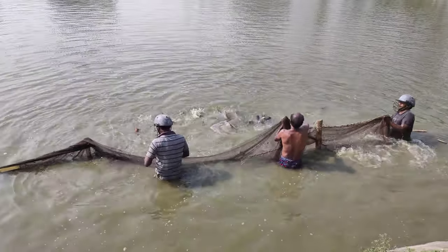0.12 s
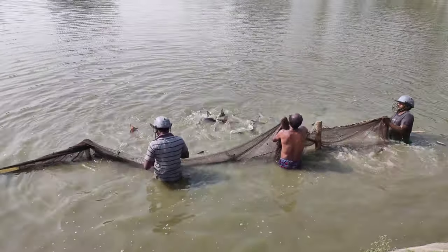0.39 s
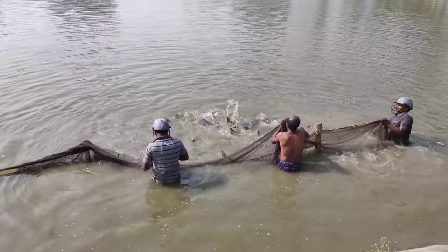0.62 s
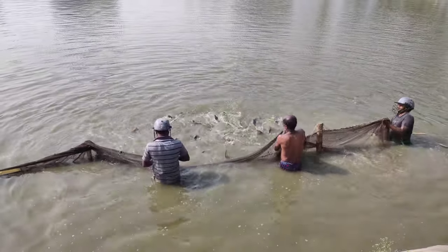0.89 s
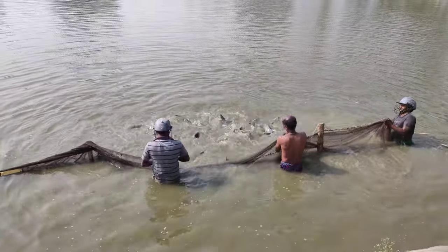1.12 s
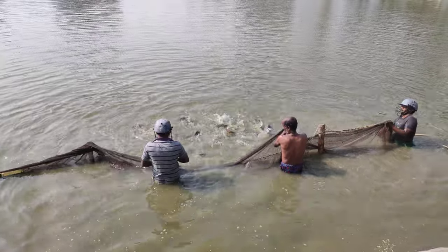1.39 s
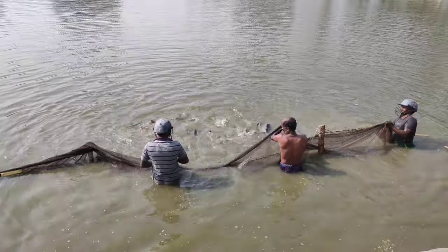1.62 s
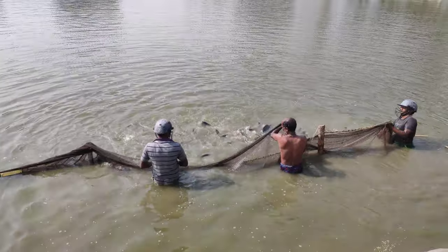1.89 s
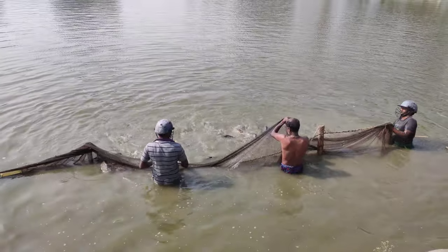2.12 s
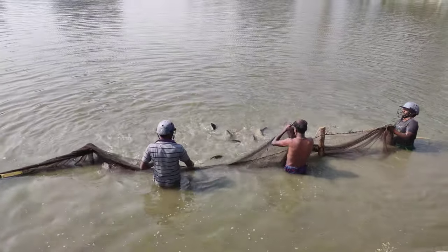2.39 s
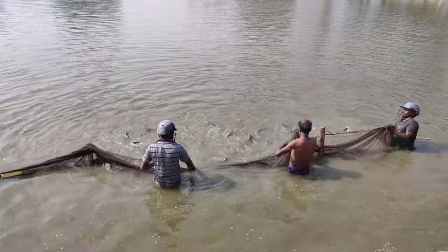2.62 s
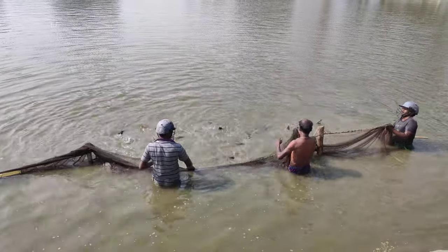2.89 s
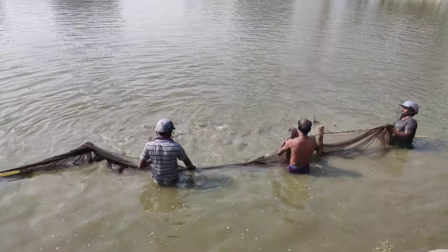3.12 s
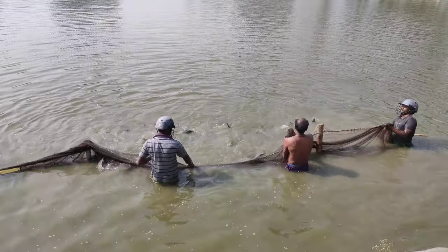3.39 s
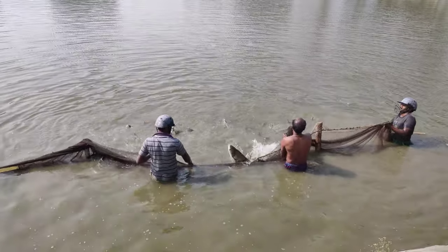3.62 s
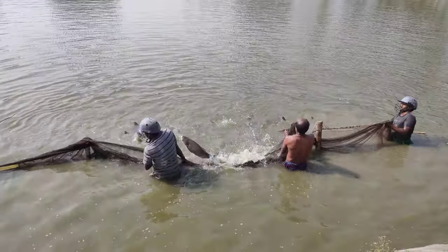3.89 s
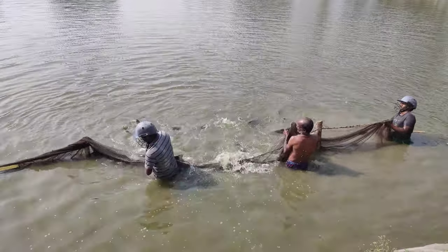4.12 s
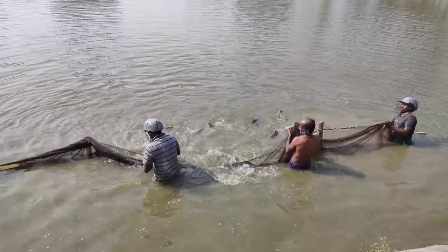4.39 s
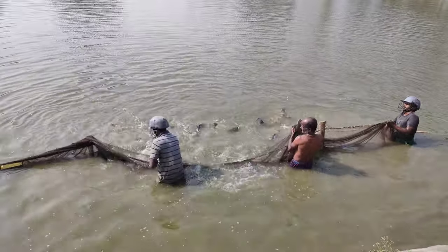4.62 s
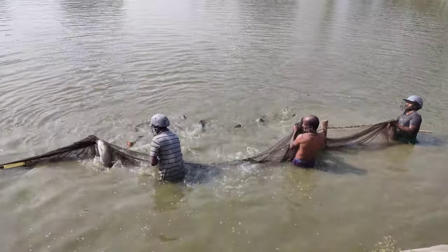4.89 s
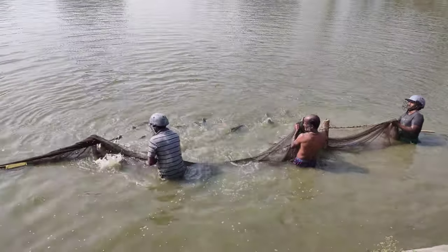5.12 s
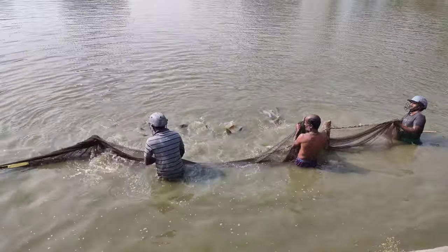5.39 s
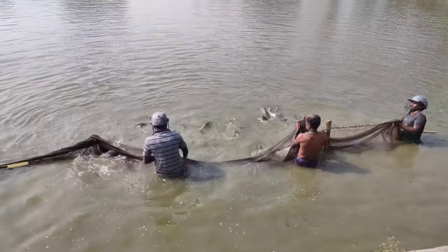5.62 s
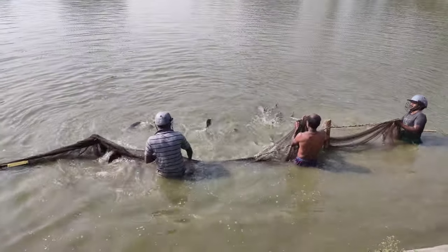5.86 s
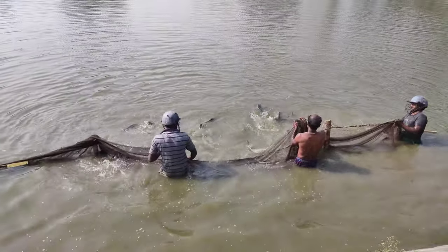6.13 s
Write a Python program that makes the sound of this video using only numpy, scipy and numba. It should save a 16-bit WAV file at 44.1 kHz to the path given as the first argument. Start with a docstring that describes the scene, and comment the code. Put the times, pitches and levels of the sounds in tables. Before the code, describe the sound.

A shoal thrashes in a net in an open pond, heard from the bank a few metres away. From 0 seconds, patchy hissing spray, fine droplets and small rising plops flutter along, with a little surge near 0.8. The wash thins from 1.5 to 3, with light flicks and ticks; a distant hoarse crow caws at about 2.15 and again, clearer, at 3.0. Slosh builds from 3.4 and peaks at about 3.7 in a loud hollow plop, low thumps and a crack of spray raining back. Splashing eases, with a dull heave at 4.2, then a second heavy thump and deep gurgling slosh at 4.8. Busy fizz and plops continue, with a smaller thump at 5.36 and a faint thin wavering tone around 5.5 to 6. Soft low breeze rumbles mostly on the right, chiefly from 2 to 4.2 seconds.

```python
"""Fish thrash in a net dragged through a shallow pond: hissing spray, fizzing droplets, gurgles and plops.
Big fish thump and slap some metres from a phone on the bank; a crow caws, a thin tone sounds far off.
A breeze rumbles mostly on the right microphone port; the water lies nearer that port, so the left hears it later.
Water sounds are sums of decaying, climbing sines and filtered noise; the caw is a stack of close overtones,
the far tone one wavering sine, and the breeze low-pitched noise."""
import sys
import numpy as np
from scipy import signal
from scipy.fft import rfft, irfft
from scipy.io import wavfile
from scipy.ndimage import uniform_filter1d
from numba import njit

SR = 44100
rng = np.random.default_rng(int(sys.argv[2]) if len(sys.argv) > 2 else 0)


def to_wav(sig):
    """Store sig (one row per channel, or 1-D mono) as 16-bit WAV at the path in sys.argv[1].

    Samples outside -1..1 are clipped; the rate is SR.
    """
    pcm = np.clip(np.atleast_2d(sig), -1, 1) * 32767
    pcm = np.round(pcm).astype(np.int16)
    wavfile.write(sys.argv[1], SR, pcm.T)  # frames by channels


def elevation(decibels):
    """Turn decibel levels (scalar or array-like) into linear amplitude ratios."""
    levels = np.asarray(decibels, float)
    return 10 ** (levels / 20)


N = 275605
T = np.arange(N) / SR

# Spectrum of the spray as the phone's microphone hears it, deep dips near 5 and 8 kHz included. Each row:
# frequency in Hz, relative density in dB per Hz.
FIZZ_SPECTRUM = [(350, -2), (600, -8.5), (777, -9.5), (941, -13.5), (1360, -12), (1540, -8.5), (2840, -9),
                 (3830, -9.5), (4400, -13), (4960, -21.5), (5500, -13.5), (6260, -7.5), (7100, -15),
                 (8100, -29.5), (8800, -22.5), (13200, -25.5), (15600, -37.5)]
# how much later the left port hears a splash, and how far that varies along the net
LAG_S, LAG_SPREAD_S = 0.00023, 0.00009


def level(x, db):
    """Scale to an rms level."""
    return x * elevation(db) / np.sqrt(np.mean(x ** 2))


def colour(x, points):
    """Causal filter through (Hz, dB) points: the folded cepstrum gives the minimum-phase response."""
    hz, db = np.transpose(points)
    curve_db = np.interp(np.log(np.linspace(1, SR / 2, 2049)), np.log(hz), db)
    cepstrum = irfft(np.log(elevation(curve_db)))
    # fold the second half onto the first
    cepstrum[1:2048] *= 2
    cepstrum[2049:] = 0
    response = irfft(np.exp(rfft(cepstrum)))
    return signal.fftconvolve(x, response)[:N]


def walk(rate):
    """Random levels held 1 / rate s and slewed twice; spread near 1."""
    hold = int(SR / rate)
    steps = np.repeat(rng.standard_normal(N // hold + 1), hold)
    return 1.3 * uniform_filter1d(uniform_filter1d(steps, hold), hold)[:N]


def swells(rows, rise_s, fall_db_per_s, fade_db_per_s=0):
    """Summed gains of (s, length, dB) rows: each climbs to its start, holds or fades for its length, then dies away."""
    out = 0
    for start, length, db in rows:
        climb_db = 30 * np.maximum(start - T, 0) / rise_s  # the last 30 dB take rise_s
        fade_db = fade_db_per_s * np.clip(T - start, 0, max(length, 0))
        fall_db = fall_db_per_s * np.maximum(T - start - length, 0)
        out = out + elevation(db - climb_db - fade_db - fall_db)
    return out


@njit
def ring(out, s, hz, cycles, gain, rise, glide):
    """Each bubble swells smoothly, rings and decays at a rate set by its cycles while its pitch climbs."""
    for k in range(len(s)):
        first = int(s[k] * SR) + 1
        last = first + int(3 * cycles[k] * SR / hz[k])
        for i in range(max(first, 0), min(last, len(out))):
            u = (i / SR - s[k]) * hz[k] / cycles[k]  # age as a share of the bubble's cycles
            swell = (1 - np.exp(-(u / rise) ** 2)) * np.exp(-2.5 * u)
            out[i] += gain[k] * swell * np.sin(2 * np.pi * cycles[k] * u * (1 + glide * u / 2))
    return out


def bubbles(s, hz, cycles, db, rise, glide, spread_s=0):
    """Bubbles heard at both ports, from the middle of the net or spread along it, the left port lagging."""
    lag = LAG_S + spread_s * rng.standard_normal(len(s))
    cycles = np.clip(cycles * np.ones(len(s)), 0.5, 30)
    rise = max(rise, 0.01)
    left = ring(np.zeros(N), s + lag, hz, cycles, elevation(db), rise, glide)
    right = ring(np.zeros(N), s + 0 * lag, hz, cycles, elevation(db), rise, glide)
    return np.array([left, right])


def swarm(count, lo_hz, hi_hz, cycles, scatter_db, rise, glide):
    """Many bubbles at random times and sizes, a few much louder than the rest; rms 1."""
    when, pitch, size, length = rng.random((count, 4)).T
    hz = lo_hz * (hi_hz / lo_hz) ** pitch
    db = -scatter_db * np.log(1 - 0.985 * size)
    cloud = bubbles(when * T[-1], hz, cycles * (0.5 + length), db, rise, glide, LAG_SPREAD_S)
    return level(cloud, 0)


def hiss(count):
    """Dense white spray from several spots, each noise with its own lag and flutter; rms 1."""
    out = np.zeros((2, N))
    for lag in np.linspace(LAG_S - 1.47 * LAG_SPREAD_S, LAG_S + 1.5 * LAG_SPREAD_S, count):
        flutter_db = 1.2 * walk(12) + 2.6 * walk(60)
        noise = rng.standard_normal(N) * elevation(flutter_db)
        out += [np.roll(noise, int(round(lag * SR))), noise]
    return level(out, 0)


def patchy(x, depth_db):
    """Patches of pitch and time swell and sink apart, as one fish after another breaks the surface; rms 1."""
    spec = signal.stft(x, nperseg=512)[2]
    field = rng.standard_normal(spec.shape[1:])
    field = uniform_filter1d(field, size=9, axis=0)
    field = uniform_filter1d(field, size=7, axis=1)
    patched = spec * elevation(depth_db * field / field.std())
    return level(signal.istft(patched, nperseg=512)[1][:, :N], 0)


def spray():
    """Patchy hiss, droplets and small bubbles follow the shoal; heaves add gurgle and deep slosh."""
    # How hard the shoal beats the surface. Each row: time in seconds, spray level in dB.
    shoal = [(0, -44.5), (.35, -45.5), (.76, -40), (1.15, -45.5), (1.5, -48), (2.25, -55.5), (2.55, -48),
             (2.92, -55.5), (3.05, -44.5), (3.36, -47.5), (3.55, -35.5), (3.95, -40), (4.62, -45),
             (4.74, -38), (5.1, -39), (5.4, -43.5), (5.7, -41), (6.25, -46)]
    # Big fish heaving the water about. Each row: start in seconds, length in seconds, slosh gain in dB.
    heaves = [(.36, 0.11, -54), (3.41, 0.33, -43), (4.18, 0.026, -46.5), (4.76, 0.096, -43.5),
              (5.36, 0.026, -55)]
    usual_spray_db, calm_slosh_db = -45, -79
    gurgle_db, gurgle_per_db = -53.5, 0.62  # gurgle at the usual spray, dB gained per dB of spray
    heave_gurgle_db = -7.5  # gurgle over the slosh of a heave

    fizz_db = np.interp(T, *np.transpose(shoal))
    effort_db = fizz_db - usual_spray_db
    heave = swells(heaves, rise_s=0.096, fall_db_per_s=79)
    gurgle_gain = elevation(gurgle_db + gurgle_per_db * effort_db) + elevation(heave_gurgle_db) * heave

    drops = swarm(count=8000, lo_hz=1300, hi_hz=13400, cycles=1.63, scatter_db=3.5, rise=0.046, glide=0.065)
    beads = swarm(count=2500, lo_hz=1096, hi_hz=7340, cycles=22.4, scatter_db=2, rise=0.1, glide=0.11)
    blips = swarm(count=700, lo_hz=760, hi_hz=2208, cycles=15, scatter_db=2.5, rise=0.28, glide=0.144)
    white = patchy(hiss(count=5), depth_db=2.2)
    white = white + elevation(-4) * drops + elevation(-6) * beads + elevation(-9.5) * blips
    white = white * elevation(0.9 * walk(25))  # the whole wash surges together
    fizz = level(np.array([colour(c, FIZZ_SPECTRUM) for c in white]), 0)

    gurgle = swarm(count=1800, lo_hz=580, hi_hz=1000, cycles=12, scatter_db=3.8, rise=0.22, glide=0.12)
    slosh = swarm(count=1200, lo_hz=199.5, hi_hz=585, cycles=4.44, scatter_db=2.5, rise=0.58, glide=0.12)
    # small bubbles leave the range below them dark
    small = elevation(fizz_db) * fizz + gurgle_gain * gurgle
    small = signal.sosfilt(signal.butter(8, 540, "high", fs=SR, output="sos"), small)
    return small + (heave + elevation(calm_slosh_db)) * slosh


def plops():
    """Air pockets close under the surface, each a short ring that climbs in pitch."""
    # Each row: start in seconds, gain in dB ahead of the swell, starting pitch in Hz, decay length in cycles.
    pockets = [(0.06, -27, 692, 8.4), (0.245, -34, 582, 11), (.268, -26, 740, 6), (0.304, -29.5, 650, 10.5),
               (0.376, -19.5, 695, 7.8), (.552, -30, 757, 25), (.588, -30.5, 618, 11.6),
               (.945, -32.5, 710, 14), (1.017, -30.5, 556, 6), (1.054, -29.5, 615, 3),
               (1.083, -37, 1020, 17), (1.19, -33.5, 1150, 25), (1.286, -28.5, 644, 12.8),
               (1.458, -30.5, 1037, 20), (2.018, -36.5, 703, 15), (2.207, -29, 790, 17),
               (2.8, -35, 750, 12.5), (3.007, -30.5, 763, 11), (3.389, -33.5, 638, 6.8),
               (3.451, -25.5, 654, 5.3), (3.552, -18.5, 680, 2.7), (3.603, -23, 810, 16),
               (3.691, -0.5, 967, 4.1), (3.859, -20.5, 624, 4.5), (3.945, -33.5, 690, 12),
               (3.988, -19, 645, 1.4), (4.588, -26.5, 730, 12.7), (4.739, -19.5, 700, 6.4),
               (4.804, -10, 504, 5.9), (4.908, -26, 783, 26), (5.001, -21, 606, 4.1),
               (5.173, -23, 1020, 7.1), (5.192, -25, 1490, 21), (5.236, -30, 780, 6.9),
               (5.369, -26, 1057, 14), (5.585, -33.5, 632, 19), (5.755, -29.5, 575, 6.4)]
    s, db, hz, cycles = np.transpose(pockets)
    return bubbles(s, hz, cycles, db, rise=0.19, glide=0.1)


def thumps():
    """Heavy bodies fall back into the water, each a low ring that climbs in pitch."""
    # Each row: start in seconds, gain in dB ahead of the swell, starting pitch in Hz, decay length in cycles.
    bodies = [(0.4, -40, 218, 13), (3.421, -31.5, 216, 4.4), (3.51, -30.5, 250, 11), (3.663, -21, 246, 5.3),
              (3.688, -18.5, 234, 4.7), (4.233, -27.5, 173, 3.3), (4.255, -27, 225, 1.9),
              (4.797, -23, 189, 11.4), (4.804, -16, 335, 3), (5.36, -25.5, 226, 6)]
    s, db, hz, cycles = np.transpose(bodies)
    return bubbles(s, hz, cycles, db, rise=0.15, glide=0.12)


def flicks():
    """Tail flicks and drops ring high; each throws up a crack of spray that then rains back as a shower."""
    # Each row: start in seconds, ring gain in dB ahead of the swell, starting pitch in Hz, crack gain in dB.
    tails = [(1.221, -32, 2730, -36.5), (1.363, -25, 1580, -58), (1.693, -37, 1560, -67),
             (1.484, -23.5, 1590, -45), (2.513, -31, 2200, -45.5), (2.665, -44, 1800, -40),
             (2.82, -28, 3500, -47.5), (3.344, -17.5, 2470, -63), (3.402, -18, 1710, -40.5),
             (3.543, -24, 1180, -34), (3.676, -21, 3010, -43), (3.689, -33, 1600, -27.5),
             (3.835, -27, 3050, -32), (3.991, -16.5, 3770, -34.5), (4.268, -22, 2800, -49),
             (4.412, -39, 2580, -34.5), (4.72, -21, 3500, -35), (4.804, -23, 2180, -27.5),
             (4.9895, -21, 3030, -37), (5.177, -24, 1420, -38), (5.879, -18, 1870, -38)]
    crack_s, shower_s, shower_db = 0.0025, 0.027, -12  # times to each peak, shower under crack
    s, db, hz, crack_db = np.transpose(tails)
    rings = bubbles(s, hz, 8, db, rise=0.2, glide=0.1)

    kicks = np.bincount((s * SR).astype(int), elevation(crack_db), N)
    age = T[:8000]
    crack = age / crack_s * np.exp(1 - age / crack_s)
    shower = age / shower_s * np.exp(1 - age / shower_s)
    puff = signal.fftconvolve(kicks, crack + elevation(shower_db) * shower)[:N]
    thrown = level(np.array([colour(c, FIZZ_SPECTRUM) for c in hiss(count=2)]), 0)
    thrown = signal.sosfilt(signal.butter(4, 600, "high", fs=SR, output="sos"), thrown)
    return rings + puff * thrown


def crow():
    """A fluttering throat gives close, hoarse lines that arch and fall together; the bank smears them."""
    # Two caws, the first farther off. Each row: start in seconds, length in seconds, relative level in dB,
    # relative gain in dB of the overtones under the 23rd.
    caws = [(2.152, 0.37, -51, -6), (2.991, 0.31, -40, 1.5)]
    # Strong groups of overtones. Each row: centre in multiples of the flutter, width in multiples, gain in dB.
    beak = [(14.8, 1.2, -11), (19.9, 1.6, 3), (25.7, 1.3, 0), (29, 1.4, -3)]
    steady_s, sag_hz_per_s = 0.17, 45
    low_fade_db_per_s = 63  # the low overtones give out once the pitch sags

    rows = np.array(caws)
    start = rows[:, 0]
    which = np.clip(np.searchsorted(start, T + 0.1) - 1, 0, None)
    age = np.clip(T - start[which], -0.05, 0.5)
    sagging_s = np.maximum(age - steady_s, 0)
    # scoops up toward 83.8 Hz, from 2.5 Hz under it at the start, then sags
    flutter_hz = 83.8 - 2.5 * np.exp(-age / 0.028) - sag_hz_per_s * sagging_s
    phase = 2 * np.pi * np.cumsum(flutter_hz * (1 + 0.003 * walk(40))) / SR
    low_db = rows[which, 3] - low_fade_db_per_s * sagging_s

    call = 0
    for k in range(11, 40):
        gain = sum(elevation(db) / (1 + ((k - centre) / width) ** 4) for centre, width, db in beak)
        gain = gain * elevation(low_db * (k < 23))
        hoarse = elevation(1.5 * walk(50))
        line = np.sin(k * phase + 2 * np.pi * rng.random() + 0.3 * walk(100))
        call = call + gain * hoarse * line
    call = call / 3 * swells(rows[:, :3], rise_s=0.022, fall_db_per_s=150, fade_db_per_s=10)

    echo = rng.standard_normal((2, 8000)) * np.exp(-T[:8000] / 0.02)
    wet = np.array([signal.fftconvolve(call, e / np.sqrt(np.sum(e ** 2)))[:N] for e in echo])
    return call + elevation(-3) * wet


def far_tone():
    """A thin tone far off: one sine that wavers in pitch and level and creeps upward."""
    # One row: start in seconds, length in seconds, gain in dB.
    tone = (5.49, 0.46, -54)
    start_hz, climb_hz_per_s = 763, 42
    pitch = (start_hz + climb_hz_per_s * (T - tone[0])) * (1 + 0.008 * walk(25))
    gain = swells([tone], rise_s=0.11, fall_db_per_s=120)
    return gain * elevation(4 * walk(40)) * np.sin(2 * np.pi * np.cumsum(pitch) / SR)


def breeze():
    """Eddies buffet the right port; the sheltered left gets a weak share and its own."""
    # Each row: start in seconds, length in seconds, rumble gain in dB ahead of each port's share.
    gusts = [(0, 0.079, -66.5), (1.46, 0.066, -66), (2.06, 0.37, -58.5), (2.75, 0.4, -54),
             (3.45, 0.75, -56), (4.85, 0.22, -63.5), (6.15, 0.12, -59.5)]
    # Spectrum of the eddies. Each row: frequency in Hz, relative density in dB per Hz.
    rumble = [(15, -36), (30, -17), (55, -4), (110, 1), (247, -11), (330, -24), (430, -60)]
    still_air_db, strong_gust_db = -74, -53

    gust = swells(gusts, rise_s=0.19, fall_db_per_s=36) + elevation(still_air_db)
    edge = gust / elevation(strong_gust_db)  # weaker gusts are duller
    eddies = []
    for _ in range(2):
        noise = rng.standard_normal(N) * elevation(2.2 * walk(14))
        eddies.append(level(colour(noise, rumble), 0))
    eddies = np.array(eddies)
    dull = signal.sosfiltfilt(signal.butter(3, 160, fs=SR, output="sos"), eddies)
    right, own = gust * (dull + edge * (eddies - dull))
    return np.array([elevation(-13) * right + elevation(-7) * own, elevation(10) * right])


def scene():
    """Pond sounds pass the two ports' colours; the breeze acts on the ports themselves."""
    # Colour between the microphone ports. Each row: frequency in Hz, left minus right in dB.
    ports = [(300, 2), (700, 0.5), (1500, 5.5), (4400, 2.5), (8000, -4.5), (15000, 18)]
    pond = spray() + plops() + thumps() + flicks() + crow() + far_tone()
    hz, db = np.transpose(ports)
    left = colour(pond[0], np.c_[hz, db / 2])
    right = colour(pond[1], np.c_[hz, -db / 2])
    return np.array([left, right]) + breeze()


def top_cut(x):
    """Nothing passes above the cut-off."""
    return signal.sosfilt(signal.butter(12, 15750, fs=SR, output="sos"), x)


def record(dry):
    """The phone on the bank takes in the finished mix of both ports."""
    return top_cut(dry)


dry = scene()
out = record(dry)
to_wav(out)
```